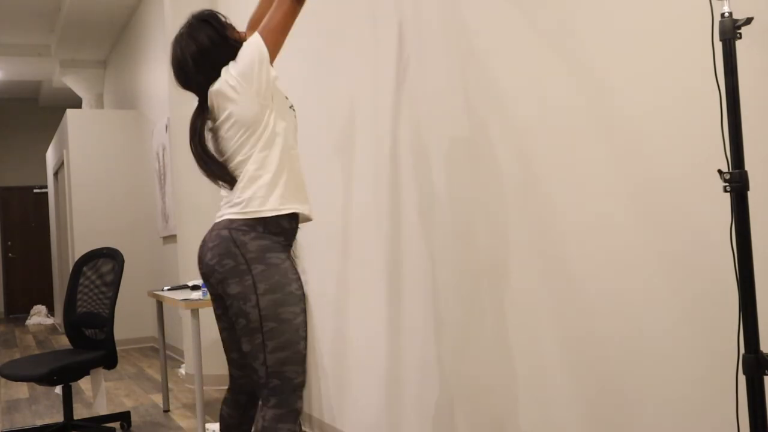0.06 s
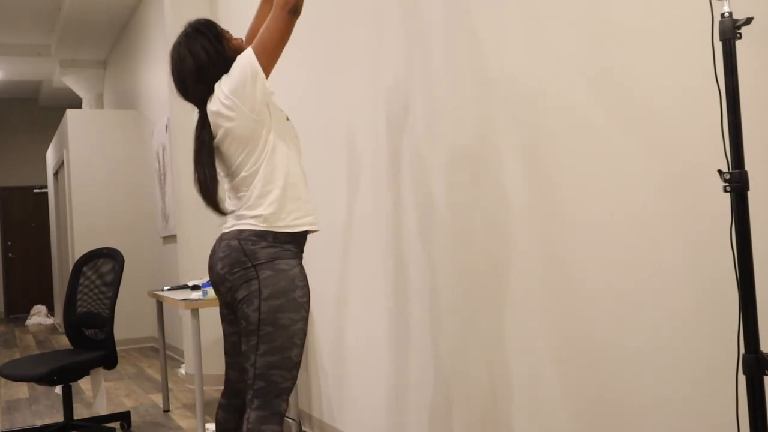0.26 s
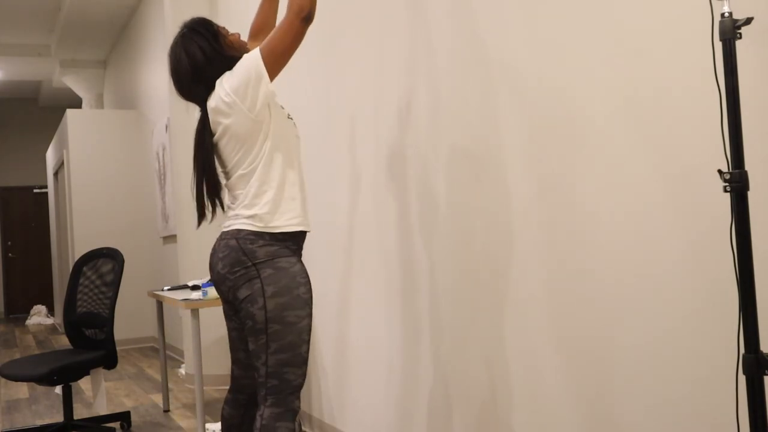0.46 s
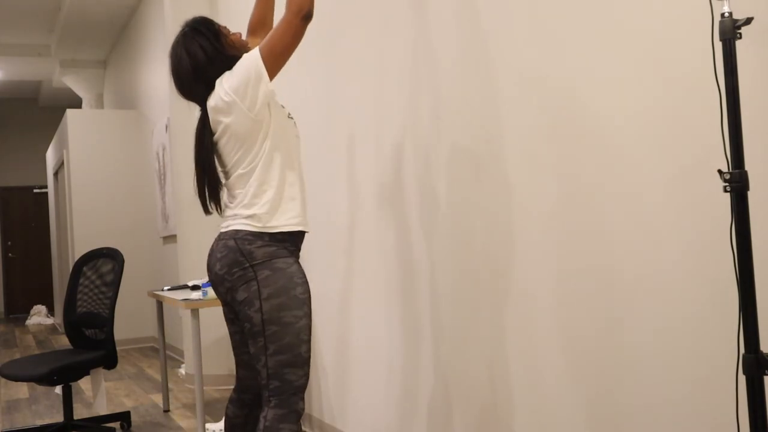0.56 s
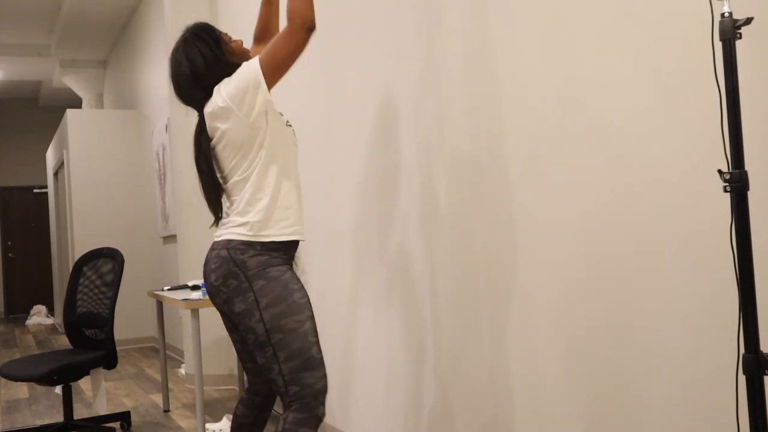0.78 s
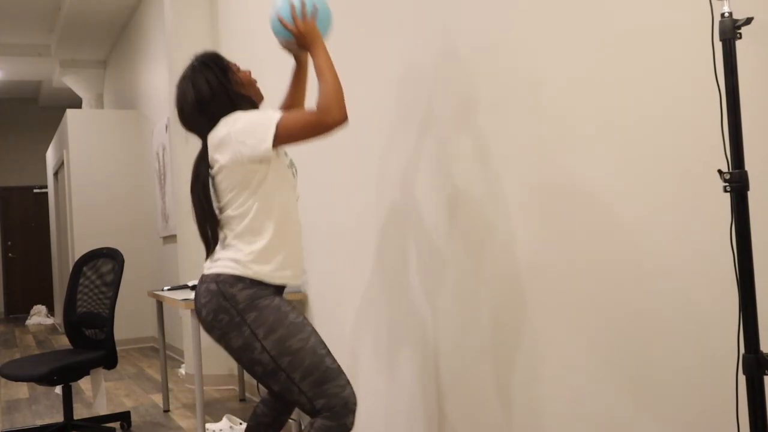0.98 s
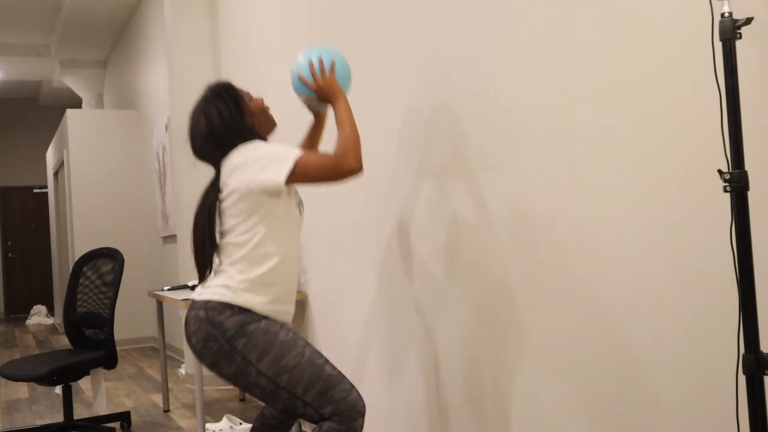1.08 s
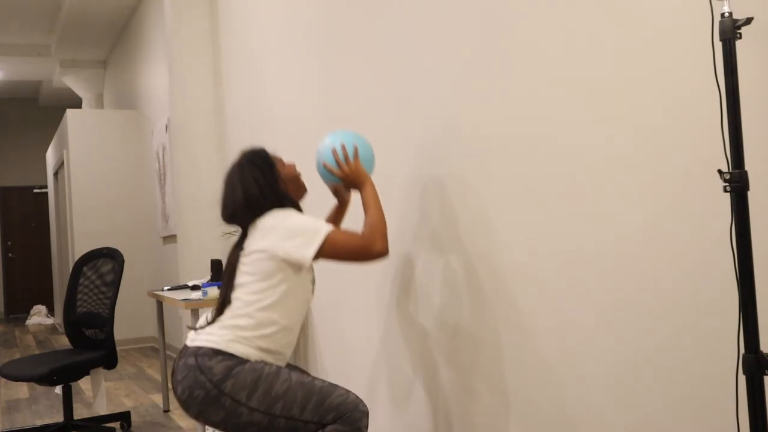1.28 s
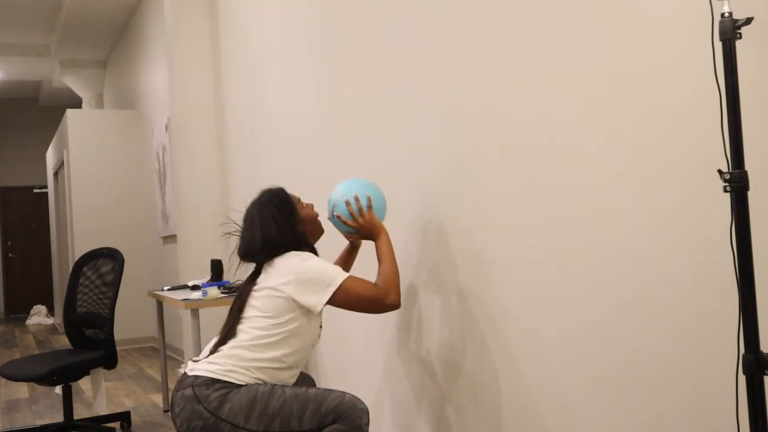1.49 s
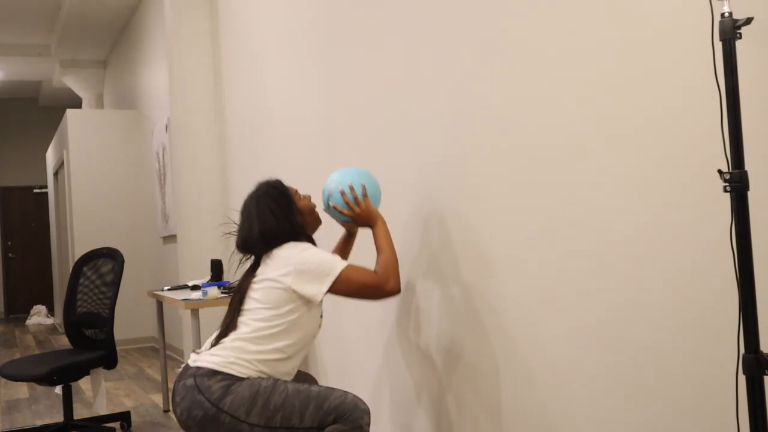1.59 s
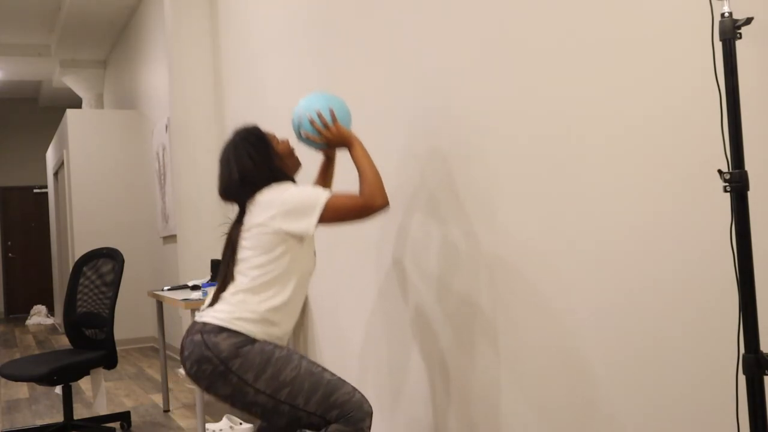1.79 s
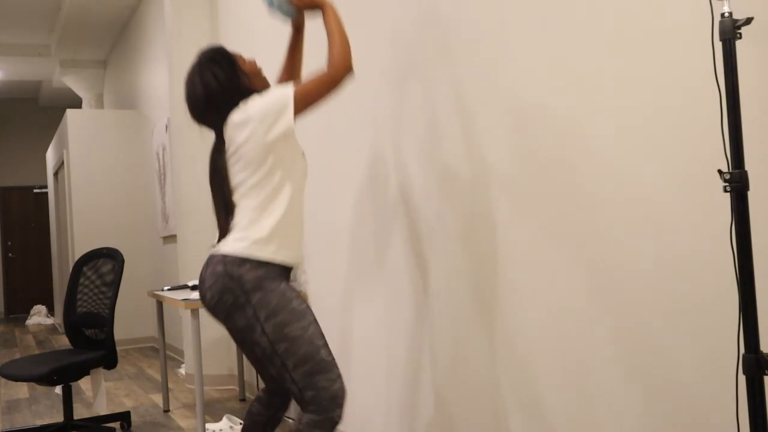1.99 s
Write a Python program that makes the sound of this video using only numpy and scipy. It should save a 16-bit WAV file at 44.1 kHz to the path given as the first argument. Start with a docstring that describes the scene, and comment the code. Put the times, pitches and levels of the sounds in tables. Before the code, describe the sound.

A light rubber ball smacks hard against a hollow wall with a short ping and low boom, then is caught with a softer cluster of hand slaps; bare reverberant room, faint ventilation, one nearby microphone.

```python
"""A rubber ball is thrown against a hollow indoor wall and caught again, in a bare, fairly live room.
Ventilation murmurs throughout (filtered noise and duct resonances), with faint ticks and rustle on top.
At 0.2 s the ball smacks the wall (pulses and crackle) and pings (decaying sines) while the wall booms.
From 0.83 s fingers and palms slap onto the ball one after another, with a dull thump and a softer ping.
More ticks and grainy rustle follow; every smack, slap and tick is answered by a diffuse room tail."""
import sys
import numpy as np
from scipy import signal
from scipy.fft import rfft, irfft, next_fast_len
from scipy.io import wavfile
from scipy.ndimage import uniform_filter1d

SR = 44100
rng = np.random.default_rng(int(sys.argv[2]) if len(sys.argv) > 2 else 0)


def transcribe(u):
    """Save the signal u as a 16-bit wav file named by the first command-line argument.

    u: samples, shape (n,) or (channels, n), limited to [-1, 1]; the rate is SR.
    q: integer samples, one column per channel.
    """
    v = np.clip(np.atleast_2d(u).T, -1, 1)
    q = np.round(v * 32767).astype(np.int16)
    wavfile.write(sys.argv[1], SR, q)


N = 90404
T = np.arange(N) / SR  # time axis [s]

# The ball flattens against the wall: (time [s], level before colouring [dB], decay constant [s])
WALL_CONTACTS = [(0.2016, -8.5, 0.0016), (0.2036, -3.5, 0.003), (.2090, -4, 0.007),
                 (0.2237, -11.5, 0.00067)]
# Colour of that smack: (frequency [Hz], gain [dB])
SMACK_COLOUR = [(30, -5), (70, 2), (180, 14), (380, 10), (600, 6), (1000, 3.5), (1300, 8.5), (1650, 8),
                (2000, 3.5), (2350, 6), (2800, 4), (3350, 5), (4600, 1.5), (9000, -0.5), (16000, -6.5)]
# Stretched rubber skin rings for an instant on the wall: (frequency [Hz], height [dB], t60 [s])
SKIN_MODES = [(1314, -28.5, 0.04), (2397, -39, 0.052), (3350, -29.5, 0.039), (4040, -32.5, 0.038)]
# Modes of the hollow wall: (frequency [Hz], height [dB], t60 [s])
WALL_MODES = [(44, -38, 0.67), (60.4, -36, .4), (73, -35, 0.68), (96, -37.5, 0.48), (124.7, -30, 0.45),
              (191.8, -42, 0.53), (228.8, -43, 0.69), (295, -46, 0.46), (346.7, -38.5, 0.63),
              (483.4, -47, 0.83), (680, -47.5, 0.45)]
# The wall heaves after the blow: (time [s], gain on the heave modes [dB])
HEAVES = [(.2025, -21), (0.2233, -18), (0.2491, -31), (0.2801, -35.5), (0.369, -46)]
# Short, deep knock of one heave: (frequency [Hz], height before the heave's gain [dB], t60 [s])
HEAVE_MODES = [(86, 6, 0.033), (185, -4.5, 0.022)]
HEAVE_RISE_S = 0.0027  # time constant of its onset

# Air ringing inside the ball: (frequency [Hz], height before the gains below [dB], t60 [s])
BALL_MODES = [(1217, -47.5, .35), (1413, -44.5, 0.4), (1786, -43, 0.59), (2374, -47.5, 0.42),
              (3230, -51, 0.27), (3470, -49.5, 0.44), (4090, -59, 0.23), (5150, -47, 0.52),
              (5880, -50, 0.26), (7010, -49, 0.19), (8800, -44, 0.11)]
RING_ON_WALL_DB, RING_IN_HANDS_DB = -2, -6

# Fingers and palms land, then slip into their grip:
# (time [s], level before colouring [dB], decay constant [s])
CATCH_CONTACTS = [(.8271, -12, 0.0057), (0.8318, -9, 0.0048), (.8358, -8.5, 0.0021), (0.8382, -4.5, 0.0023),
                  (0.8421, -6.5, 0.0018), (0.8488, -17, 0.0013), (0.868, -22, .003)]
# Colour of a hand slap: (frequency [Hz], gain [dB])
SLAP_COLOUR = [(30, -7), (110, -4.5), (180, 9), (290, 6), (430, 10), (850, 8), (1250, 7.5), (1750, 4.5),
               (2150, -2.5), (4400, -1.5), (6000, -9.5), (9000, -9), (16000, -15)]
# Dull thump of the ball stopping in the hands: (frequency [Hz], height [dB], t60 [s])
CATCH_THUMP = [(60, -49, .09), (177, -53, 0.65), (199, -34, 0.088), (207, -43.5, 0.82), (413, -37.5, .05),
               (449, -47, 0.67)]
HAND_SOFTNESS_HZ = 2200  # above this, soft palms excite the modes less and less

# Light taps, ticks and brushes of hands and shoes:
# (time [s], level before colouring [dB], decay constant [s])
TICKS = [(.0035, -17.5, 0.0045), (.134, -27.5, 0.0037), (.6185, -34, .003), (.7715, -30, 0.0033),
         (.9105, -14.5, 0.025), (1.0425, -20, 0.013), (1.286, -30.5, .008), (1.3715, -27, 0.0041),
         (1.640, -26, 0.033), (1.7742, -34, 0.0018), (1.8995, -32.5, 0.0035), (1.948, -28.5, 0.0083),
         (2.037, -24, 0.0083)]
# Colour of a tick: (frequency [Hz], gain [dB])
TICK_COLOUR = [(100, -4.5), (500, -4), (1500, -2.5), (3500, -1.5), (7500, -6.5), (16000, -13)]
# Rustle of clothes and of the ball rolling off the fingers: (time [s], level [dB])
RUSTLE_LEVEL = [(0, -46), (.04, -52), (.11, -58), (.19, -57.5), (.45, -60), (.8, -74.5), (1.05, -62),
                (1.2, -61), (1.45, -70.5), (1.58, -68), (1.65, -68), (1.75, -77), (1.87, -73), (1.99, -66),
                (2.05, -56)]
# Colour of the rustle: (frequency [Hz], relative gain [dB])
RUSTLE_COLOUR = [(100, -18.5), (400, 0.5), (900, 2), (2000, -1), (5000, -7), (9000, -14), (16000, -30)]
RUSTLE_GRAIN_DB, RUSTLE_GRAIN_S = 3, 0.0036  # rms swing of the grain, averaging length

# Colour of ventilation and hiss: (frequency [Hz], relative density [dB per Hz])
AIR_COLOUR = [(15, -61), (25, -20), (53, -8.5), (123, -4.5), (145, -4.5), (206, -3), (236, -4), (451, -6.5),
              (489, -10.5), (677, -10), (988, -15.5), (1070, -15.5), (2410, -21.5), (14800, -27),
              (16000, -28)]
AIR_DB = -58.5  # rms level
# Duct tones: (frequency [Hz], rms level [dB])
DUCT_TONES = [(123, -71.5), (203, -68.5), (460, -70), (684, -75.5)]
DUCT_WIDTH_HZ = 11.7

CRACK_SHARE = 0.13  # amplitude of a contact's first sharp pulse; the crackle carries the other energy

# Decay of the room's tail: (frequency [Hz], t60 [s])
ROOM_T60 = [(60, 0.8), (170, 0.7), (420, 0.66), (1100, 0.67), (2900, 0.76), (5500, 0.53), (8000, 0.3),
            (14000, 0.28)]
# Strength of the tail against the direct sound, before colouring: (frequency [Hz], gain [dB])
ROOM_LEVEL = [(50, -3), (180, 6), (400, 2), (800, -5), (1500, -2), (3000, -4), (5500, 0), (12000, -6.5)]
ROOM_DELAY_S, ROOM_BUILD_S = 0.0016, 0.01  # wait before the tail, time constant of its build-up
CUTOFF_HZ = 16000


def wall_hit():
    """The ball smacks and pings, its skin and the wall's modes ring, and the wall heaves in deep knocks."""
    ping = from_db(RING_ON_WALL_DB) * ringing(BALL_MODES)
    rings = ringing(WALL_MODES) + ringing(SKIN_MODES) + ping
    heave = -ringing(HEAVE_MODES) * (1 - np.exp(-T / HEAVE_RISE_S))
    boom = sum(from_db(db) * delayed(heave, s) for s, db in HEAVES)
    first_touch_s = WALL_CONTACTS[0][0]
    smack = contacts(WALL_CONTACTS, SMACK_COLOUR)
    return smack + delayed(rings, first_touch_s) + boom


def catch():
    """Hands slap onto the ball; the first firm touch sets it thumping and softly ringing."""
    ping = smoothed(ringing(BALL_MODES), 1 / (2 * np.pi * HAND_SOFTNESS_HZ))
    rings = ringing(CATCH_THUMP) + from_db(RING_IN_HANDS_DB) * ping
    firm_touch_s = CATCH_CONTACTS[1][0]
    slaps = contacts(CATCH_CONTACTS, SLAP_COLOUR)
    return slaps + delayed(rings, firm_touch_s)


def movement():
    """The thrower's small ticks, and a rustle of coloured noise whose level flutters in fine grains."""
    slow_noise = uniform_filter1d(rng.standard_normal(N), max(int(RUSTLE_GRAIN_S * SR), 1))
    grain_gain = from_db(RUSTLE_GRAIN_DB * rms_one(slow_noise))
    rustle = rms_one(coloured(rng.standard_normal(N) * grain_gain, RUSTLE_COLOUR))
    rustle_gain = from_db(np.interp(T, *np.transpose(RUSTLE_LEVEL)))
    return contacts(TICKS, TICK_COLOUR) + rustle * rustle_gain


def ventilation():
    """Steady air noise, which also drives a few narrow duct resonances as separate noise streams."""
    out = from_db(AIR_DB) * rms_one(coloured(rng.standard_normal(N), AIR_COLOUR))
    for hz, db in DUCT_TONES:
        resonance = np.exp(-np.pi * DUCT_WIDTH_HZ * T) * np.sin(2 * np.pi * hz * T)
        tone = irfft(rfft(resonance) * rfft(rng.standard_normal(N)), N)
        out += from_db(db) * rms_one(tone)
    return out


def contacts(rows, colour):
    """Each contact is a sharp pulse and a few milliseconds of dying crackle, heard with the room's answer."""
    direct = np.zeros(N)
    for s, db, decay_s in rows:
        burst = rng.standard_normal(N) * np.exp(-T / decay_s)
        burst *= np.sqrt((1 - CRACK_SHARE ** 2) / np.sum(burst ** 2))
        burst[0] += CRACK_SHARE
        direct += from_db(db) * delayed(burst, s)
    return coloured(direct + room_tail(direct), colour)


def room_tail(x):
    """The room stores each contact's energy and returns it as diffuse noise, dying soonest in the top treble."""
    edges = np.geomspace(30, 18000, 19)  # band edges [Hz]
    fed_energy = smoothed(delayed(x ** 2, ROOM_DELAY_S), ROOM_BUILD_S)
    tail = np.zeros(N)
    for low, high in zip(edges, edges[1:]):
        hz = np.sqrt(low * high)
        band_filter = signal.butter(2, [low, high], "band", fs=SR, output="sos")
        band = signal.sosfilt(band_filter, rng.standard_normal(N))
        # energy is amplitude squared, so its exponential decay rate is twice the amplitude's, hence the 2
        stored_energy = smoothed(fed_energy, at_hz(ROOM_T60, hz) / (2 * np.log(1000)))
        tail += band * from_db(at_hz(ROOM_LEVEL, hz)) * np.sqrt(stored_energy)
    return tail


def ringing(modes):
    """Struck modes as decaying sines."""
    return sum(from_db(db) * fade(t60) * np.sin(2 * np.pi * hz * T) for hz, db, t60 in modes)


def fade(t60):
    """Exponential decay by 60 dB in t60 seconds."""
    return np.exp(-np.log(1000) * T / t60)


def smoothed(x, seconds):
    """One-pole lag that keeps the total; the tiny offset keeps stored energy above zero."""
    r = np.exp(-1 / (seconds * SR))
    return signal.lfilter([1 - r], [1, -r], x + 1e-24)


def coloured(x, points):
    """Causal (minimum-phase) filter with the given (frequency [Hz], gain [dB]) curve."""
    size = 2 * next_fast_len(N)
    hz = np.arange(size // 2 + 1) * SR / size
    cepstrum = irfft(np.log(from_db(at_hz(points, hz))))
    # folding the cepstrum onto positive time makes the filter minimum-phase
    cepstrum[1:size // 2] *= 2
    cepstrum[size // 2 + 1:] = 0
    return irfft(rfft(x, size) * np.exp(rfft(cepstrum)))[:N]


def at_hz(points, hz):
    """Read a table on a log-frequency axis."""
    f, value = np.transpose(points)
    return np.interp(np.log(np.maximum(hz, 1)), np.log(f), value)


def delayed(x, s):
    """The sound, starting s seconds later."""
    return np.concatenate([np.zeros(max(int(s * SR), 0)), x])[:N]


def rms_one(x):
    """Scale to rms 1."""
    return x / np.sqrt(np.mean(x ** 2) + 1e-20)


def from_db(db):
    """Decibels to gain."""
    return 10 ** (np.asarray(db) / 20)


def scene():
    """Everything at one microphone."""
    return (wall_hit() + catch() + movement() + ventilation())[None]


def record(dry):
    """The top is cut steeply by an elliptic low-pass."""
    low_pass = signal.ellip(10, .2, 70, CUTOFF_HZ, fs=SR, output="sos")
    return signal.sosfilt(low_pass, dry)


dry = scene()
out = record(dry)
transcribe(out)
```